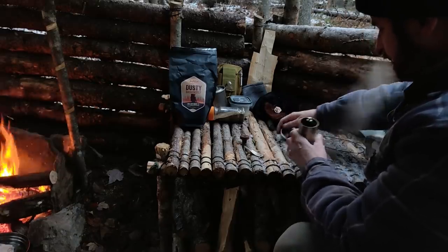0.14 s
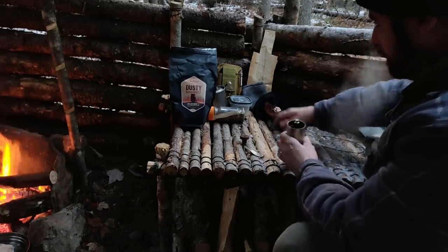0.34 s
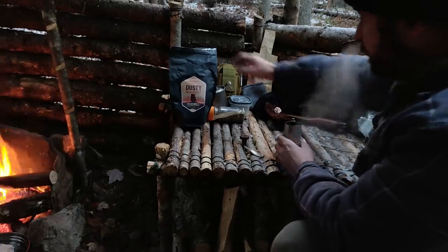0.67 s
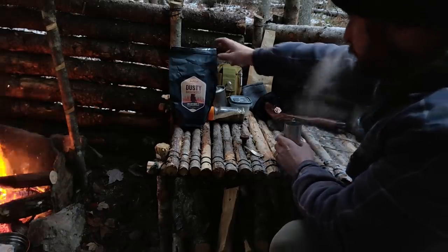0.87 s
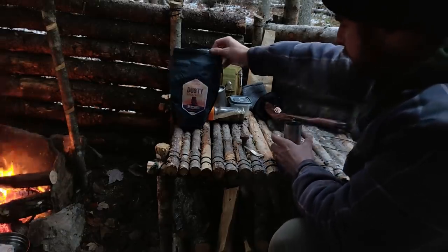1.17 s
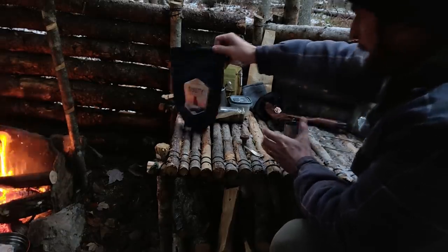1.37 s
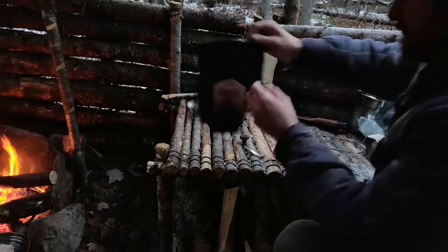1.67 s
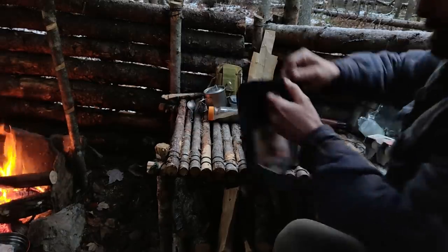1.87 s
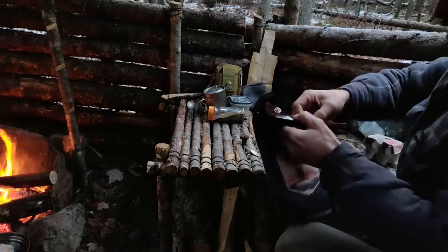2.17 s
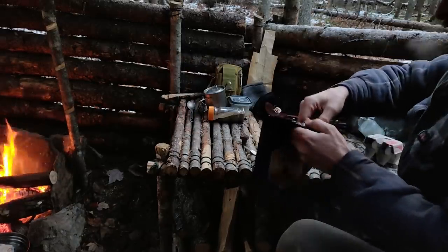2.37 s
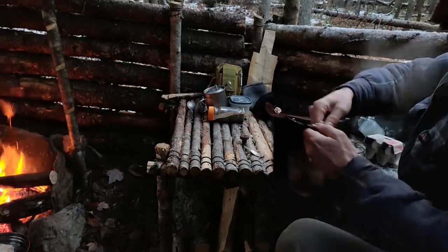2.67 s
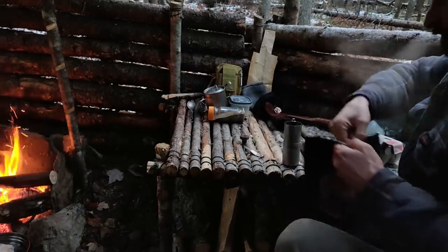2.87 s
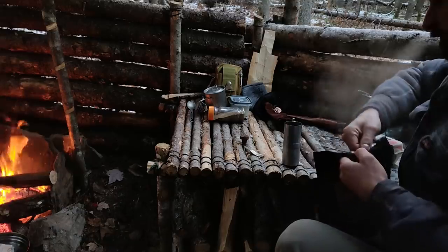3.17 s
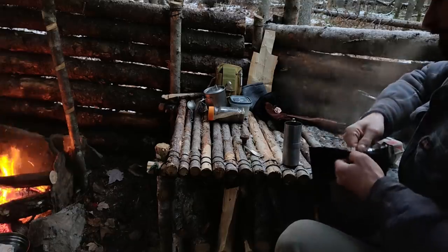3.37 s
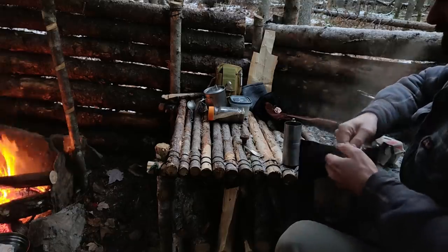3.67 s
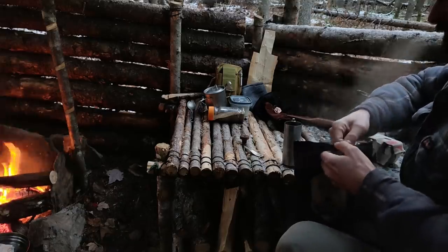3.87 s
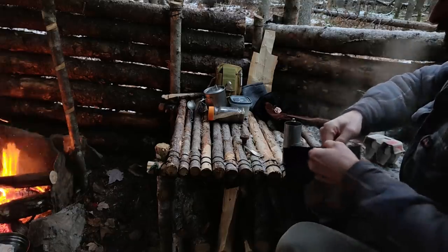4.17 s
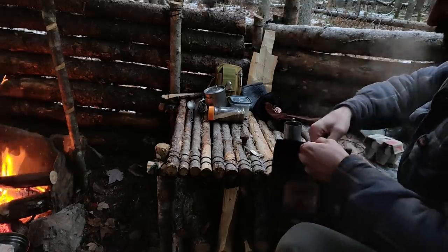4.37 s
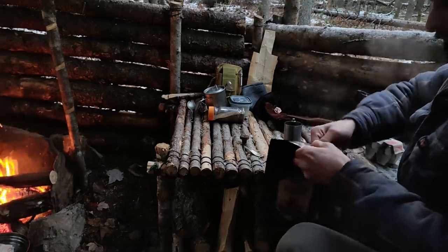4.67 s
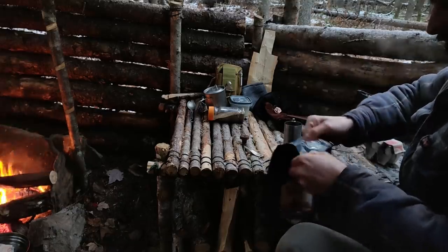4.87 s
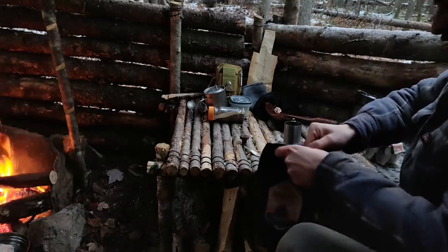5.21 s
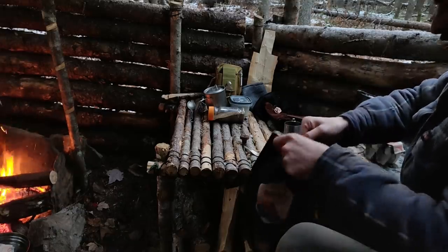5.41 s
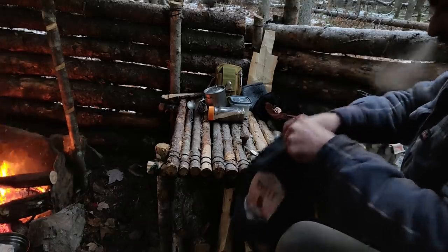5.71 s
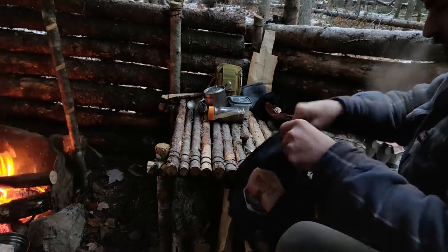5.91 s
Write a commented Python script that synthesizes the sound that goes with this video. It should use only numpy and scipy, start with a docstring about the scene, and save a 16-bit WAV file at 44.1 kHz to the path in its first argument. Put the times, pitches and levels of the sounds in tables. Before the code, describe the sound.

A faint, steady hiss and low fire flutter run throughout, with a few tiny ember ticks in the first second. From about 0.3 to 0.7 seconds a small steel crank bounces on a stick table: quick wooden knocks with a light metallic ring, stopped by a firmer knock. At 1.1 seconds hands lift a stiff foil bag with soft crinkles. Sharper, louder crackling follows from 1.9 to 2.7 seconds. The handling then thins to quiet rustle and isolated snaps, with a crisp one near 3.4 and a loud hollow pop at 3.7. From 4.5 seconds the creases snap more densely as the bag is worked open. The loudest, fullest crumpling comes between 5.3 and 6 seconds, with small air pops and a slightly hollow resonance from the opening bag. Everything sounds close and fairly dry.

```python
"""In a log shelter, at a stick table, the steel crank of a coffee grinder is laid down: each bounce
excites the damped modes of wood and steel. Hands then lift a stiff foil bag of beans and work it open.
Creases buckle and snap over a rustle, air pockets pop, and the bag's cavity resonates more as it opens.
Close by a fire flutters and its embers tick, over the hiss of the camp."""
import sys
import numpy as np
from scipy import signal
from scipy.fft import rfft, irfft
from scipy.io import wavfile
from scipy.ndimage import uniform_filter1d

SR = 44100
rng = np.random.default_rng(int(sys.argv[2]) if len(sys.argv) > 2 else 0)


def store_wav(level_fs):
    """Save 16-bit WAV to argv[1]."""
    pcm = np.round(np.clip(np.atleast_2d(level_fs), -1, 1) * 32767)
    wavfile.write(sys.argv[1], SR, pcm.T.astype(np.int16))


N = 266805
TIME = np.arange(N) / SR


def amp(db):
    """Amplitude ratio of a level in decibels."""
    return 10 ** (np.asarray(db) / 20)

def unit_rms(x):
    """Normalisation to unit mean power."""
    return x / np.sqrt(np.mean(x ** 2) + 1e-20)

def spectrum_db(points, hz):
    """Interpolation of levels on a logarithmic frequency axis."""
    point_hz, db = np.transpose(points)
    return np.interp(np.log(hz + 1), np.log(point_hz + 1), db)

def add(mix, start_s, sound):
    """Superposition: a sound sums into the mix from its start time."""
    part = mix[round(start_s * SR):][:len(sound)]
    part += sound[:len(part)]

def filtered(x, order, hz, kind):
    """Butterworth filtering, flat in the passband."""
    return signal.sosfilt(signal.butter(order, hz, kind, fs=SR, output="sos"), x)

def shaped(x, gain_db):
    """Short-time spectral weighting by gain_db(hz, t)."""
    hz, t, spectra = signal.stft(x, SR, nperseg=256)
    return signal.istft(spectra * amp(gain_db(hz[:, None], t)), SR, nperseg=256)[1][:N]


# Each row: frequency in Hz, relative spectral density in dB.
AIR_SPECTRUM = [(20, -2.5), (130, -3), (250, -6.5), (650, -8.5), (1500, -19), (5000, -18.5), (9000, -19.5),
                (12000, -10.5), (15400, -7.5), (16100, -30)]

def flames_and_hiss(level_db=-57):
    """Coloured noise, slowly modulated: the low flutter of the flames and the hiss of the camp."""
    colour = amp(spectrum_db(AIR_SPECTRUM, np.fft.rfftfreq(N, 1 / SR)))
    noise = irfft(rfft(rng.standard_normal(N)) * colour, N)
    swell_db = unit_rms(uniform_filter1d(uniform_filter1d(rng.standard_normal(N), 6000), 6000))
    return amp(level_db + swell_db) * unit_rms(noise)


# Each row: lower and upper band edge in Hz, 60 dB decay time in seconds, level in dB.
CRACK_BANDS = [(214, 457, 0.066, -14.5), (562, 1395, 0.074, -3), (1685, 3300, 0.061, -3.5),
               (3250, 6000, 0.064, -3), (5870, 11000, 0.06, -4.5), (10860, 15800, 0.068, -1)]
# Each entry: a band's gain in dB per dB of brightness. Tight creases are thin, broad folds full.
BRIGHTNESS_SLOPES = (-0.4, -0.81, 0, 0.38, 1.24, 1.58)

def cracks(events, tick_s):
    """Impulsive excitation: a sharp tick, then an exponential noise tail off foil and logs."""
    out, t = np.zeros(N), np.arange(SR // 10) / SR
    tail_db = np.array(events)[:, 3:]
    noise = rng.standard_normal((len(events), len(t)))
    noise[:, 0] = -4.5  # the onset is one spike
    for (lo_hz, hi_hz, t60, band_db), slope in zip(CRACK_BANDS, BRIGHTNESS_SLOPES):
        envelope = np.exp(-t / tick_s) + amp(tail_db - 60 * t / t60)
        bursts = filtered(noise * envelope, 3, [lo_hz, hi_hz], "band")
        peak_power = uniform_filter1d(bursts ** 2, 130, mode="constant").max(1)
        bursts /= np.sqrt(peak_power)[:, None]
        low_cut_db = -7 if slope < 0 else 0
        for (start_s, level_db, bright_db, _), burst in zip(events, bursts):
            add(out, start_s, amp(level_db + band_db + slope * bright_db + low_cut_db) * burst)
    return out


# Each row: start in seconds, level in dB, brightness in dB, tail in dB relative to the tick.
EMBER_POPS = [(0.2144, -47.5, 4.5, -7.5), (0.5854, -36.5, 4.5, -13), (0.676, -63, 15.5, -8),
              (0.8312, -42, 7.5, -5)]

def embers():
    """Each popping ember radiates a brief broadband transient."""
    return cracks(EMBER_POPS, tick_s=0.00077)


def free_vibration(modes, weight_db, t):
    """Modal superposition: damped sines set off together, each with its own weight."""
    hz, db, t60 = np.transpose(modes)[:, :, None]
    return (amp(db + weight_db[:, None] - 60 * t / t60) * np.sin(2 * np.pi * hz * t)).sum(0)


# Each row: mode frequency in Hz, relative level in dB, 60 dB decay time in seconds.
STICK_MODES = [(428, 0.5, 0.09), (666, 1.5, 0.077), (740, -5, 0.067), (853, 4.5, 0.04), (1034, 4, 0.043),
               (1080, 0.5, 0.059), (1186, 3.5, 0.047), (1370, -6, 0.057), (1600, 13, 0.016)]

def stick_knock(spot_hz, scrape_s):
    """Forced vibration: an uneven push on rough bark drives the modes near the struck spot's pitch."""
    t = np.arange(8000) / SR
    force = np.exp(-t / scrape_s) * rng.standard_normal(len(t))
    force[0] = 7  # the first touch
    weight_db = -26 * np.log2(np.array(STICK_MODES)[:, 0] / spot_hz) ** 2
    knock = signal.oaconvolve(force, free_vibration(STICK_MODES, weight_db, t))
    knock = filtered(knock, 2, 330, "high")  # the knocks carry no bass
    knock /= abs(knock).max()
    tail = np.exp(-t / (scrape_s + 0.012)) * rng.standard_normal(len(t))
    thud, clatter, grit = (250, 610, -29.5), (504, 1670, -19.5), (2370, 5700, -39)
    for lo_hz, hi_hz, db in thud, clatter, grit:
        band = filtered(tail, 2, [lo_hz, hi_hz], "band")
        onset_rms = np.sqrt(np.mean(band[:900] ** 2))
        add(knock, 0, amp(db) * band / onset_rms)
    return knock


# Each row: mode frequency in Hz, level in dB, 60 dB decay time in seconds.
STEEL_MODES = [(1750, -12, 1.2), (1796, -4, 1.5), (2560, 4, .05), (4027, -25, .4), (4613, 1, .2),
               (4660, -7, .14), (6853, -19, .08), (6910, -21, .08), (10190, -15, .04), (14700, -17, .06)]

def steel_ring(hardness):
    """Impact excitation: hard contacts favour high modes; slow bending modes need a long, soft push."""
    t = np.arange(SR // 2) / SR
    octaves = np.log2(np.array(STEEL_MODES)[:, 0] / 4600)
    tilt_db = hardness * octaves * np.where(octaves < 0, 3, 0.4)
    attack = 1 - np.exp(-t / 0.00035)
    roughness = unit_rms(uniform_filter1d(rng.standard_normal(len(t)), 40))
    chatter = 1 + 0.37 * np.exp(-t / 0.017) * roughness  # it rattles on the bark at first
    return free_vibration(STEEL_MODES, tilt_db, t) * attack * chatter


# Each row: start in seconds, knock level in dB, pitch of the struck spot in Hz,
# scrape time constant in seconds, ring level in dB, hardness as a spectral tilt factor.
BOUNCES = [(0.261, -30, 870, 0.0099, -48, 1.5), (0.305, -18.5, 1080, 0.0079, -24, 2.5),
           (0.33, -39.5, 810, 0.037, -65, -6), (0.408, -29.5, 1040, 0.023, -28, 33),
           (0.465, -35, 730, 0.049, -31.5, 36), (0.489, -35, 1030, 0.0093, -70, 10),
           (0.5245, -13.5, 546, 0.0026, -65, 4), (0.698, -40, 666, 0.027, -54, -2)]
# Each row: time in seconds, gain of the crank's low modes in dB.
LOW_MODE_DAMPING = [(.522, -5), (.535, -3), (.66, -20), (.70, -32)]

def bouncing_crank(split_hz=2200):
    """Each collision excites wood and steel; contact damping stills the crank once it lies flat."""
    wood, steel = np.zeros(N), np.zeros(N)
    for start_s, knock_db, spot_hz, scrape_s, ring_db, hardness in BOUNCES:
        add(wood, start_s, amp(knock_db) * stick_knock(spot_hz, scrape_s))
        add(steel, start_s, amp(ring_db) * steel_ring(hardness))
    low = filtered(steel, 4, split_hz, "low") * amp(np.interp(TIME, *np.transpose(LOW_MODE_DAMPING)))
    high = filtered(steel, 4, split_hz, "high") * amp(np.interp(TIME, [0.522, 0.535], [-5, -24.5]))
    return wood + low + high


def random_impulses(per_s, spread_db):
    """A Poisson process of many small impulses and a few larger ones."""
    sizes = amp(spread_db * np.minimum(rng.exponential(1, N), 4))
    return sizes * (rng.random(N) < per_s / SR)

def crease_power(per_s, spread_db, t60=0.036):
    """Incoherent summation: the decaying powers of tiny creases add."""
    decay = amp(-120 / (t60 * SR))
    power = signal.lfilter([1], [1, -decay], random_impulses(per_s, spread_db) ** 2)
    return power / power.mean()

def dimples():
    """Snap-through: small dents in the foil flip at random, each ringing a few cycles at its pitch."""
    out, t = np.zeros(N), np.arange(900) / SR
    flips = random_impulses(per_s=350, spread_db=3.4)
    pitch_index = rng.integers(0, 14, N)
    for k, hz in enumerate(np.geomspace(560, 3600, num=14)):
        ring = np.sqrt(hz) * np.exp(-t * hz / 1.8) * np.sin(2 * np.pi * hz * t)
        out += signal.oaconvolve(flips * (pitch_index == k), ring)[:N]
    return unit_rms(out)


# Each row: time in seconds, rustle level in dB, brightness in dB.
HANDLING = [(1.08, -86, 2), (1.24, -57, 1), (1.55, -55.5, -13), (1.7, -61, -4), (1.87, -71, 10),
            (1.91, -41.5, -9), (2.08, -47.5, -2), (2.25, -41, -1.5), (2.4, -52.5, 6.5), (2.56, -40, -4.5),
            (2.76, -54.5, -0.5), (3.1, -60.5, -2.5), (3.36, -65, 3), (3.6, -59, 1.5), (4.0, -62, 2),
            (4.42, -61, 4), (4.78, -52, -7), (4.95, -39, -7), (5.3, -42.5, -16.5), (5.44, -29.5, -12),
            (5.485, -34.5, -10), (5.6, -33, -3.5), (6.05, -34, -4)]
# Each row: centre and duration in seconds, added level in dB, added brightness in dB.
CRUSHES = [(1.307, 0.061, 6.5, 4), (1.586, 0.047, 8, 3), (1.874, 0.011, 5, 13), (2.143, 0.036, 12, -2),
           (2.203, 0.076, 6, 5), (2.256, 0.025, 7, 4), (2.34, 0.029, 11, 6), (3.426, 0.04, 18, -3),
           (3.487, 0.051, 10.5, -3), (3.582, 0.028, 10.5, 9), (3.686, 0.033, 11, -29),
           (3.857, 0.064, 9, 5.5), (4.466, 0.03, 18, -10), (4.894, 0.036, 13, 14), (5.026, 0.12, 2.5, -6),
           (5.401, 0.096, 7, 12), (5.55, 0.061, 9, 5.5), (5.707, 0.033, 6.5, 0.5), (5.775, 0.11, 5.5, 0.5),
           (5.969, 0.059, 10.5, 2.5)]

def grip_db(t, column):
    """Envelope of the handling: a slow curve, plus a bump wherever a grip crushes many creases."""
    curve = np.transpose(HANDLING)
    bumps = sum(row[column + 1] * np.exp(-((t - row[0]) / (row[1] / 2)) ** 4) for row in CRUSHES)
    return np.interp(t, curve[0], curve[column], left=-99) + bumps


# Each row: frequency in Hz, relative spectral density in dB.
FOIL_SPECTRUM = [(35, -59), (213, -12), (412, 0.5), (486, -7.5), (644, 0.5), (1160, -2), (1690, -1.5),
                 (7960, -14), (14700, -7.5), (16500, -36)]

def rustle():
    """Modulated noise: each size of fold crackles in its own band, some creases in all, over a bed."""
    shared = crease_power(per_s=600, spread_db=3.9)
    edges_hz, folds = np.geomspace(130, 17000, num=9), np.zeros(N)
    for band_hz in zip(edges_hz, edges_hz[1:]):
        power = crease_power(per_s=130, spread_db=4) + 0.6 * shared + 0.2
        folds += filtered(np.sqrt(power) * rng.standard_normal(N), 2, band_hz, "band")
    foil = unit_rms(shaped(folds, lambda hz, t: spectrum_db(FOIL_SPECTRUM, hz))) + amp(-7) * dimples()
    # brightness tilts the treble above 2 kHz, levelling off at 11 kHz
    foil = shaped(foil, lambda hz, t: grip_db(t, 2) * np.log2(1 + (hz.clip(max=11000) / 2000) ** 2) / 4)
    foil *= amp(grip_db(TIME, 1))
    return filtered(foil, 2, 110, "high")  # the rustle carries no deep bass


# Each row: centre frequency in Hz, bandwidth in Hz, relative gain in dB.
CAVITY_MODES = [(420, 53, 0), (656, 71, -1), (900, 215, -6), (1110, 190, -9.5)]
# Each row: time in seconds, gain of the resonance in dB as the bag opens.
OPENING = [(5.3, -11), (5.9, 1.5)]

def bag_cavity(x):
    """Cavity resonance: the bag's sounds ring on in its air space."""
    resonance = sum(amp(db) * signal.lfilter(*signal.iirpeak(hz, hz / width, SR), x)
                    for hz, width, db in CAVITY_MODES)
    return x + resonance * amp(np.interp(TIME, *np.transpose(OPENING)))


# Each row: start in seconds, level in dB, brightness in dB, tail in dB relative to the tick.
CREASE_SNAPS = [(1.1264, -51.5, -10, 4), (1.1599, -42, -1.5, -4), (1.1842, -41.5, -2, 1),
                (1.2288, -40.5, 1, -20), (1.2529, -38.5, 1, -8), (1.2669, -40, -5, 15),
                (1.3648, -33, -7, 0), (1.4068, -41.5, -2, -6), (1.4435, -49, -11, 0), (1.4646, -36, -4, -8),
                (1.5305, -26, 0.5, -6), (1.5505, -46, -11, -10), (1.5674, -38.5, -4.5, 3),
                (1.6598, -30.5, -1.5, -7), (1.688, -50, -16, -2), (1.7432, -49.5, 2.5, -3),
                (1.9039, -21.5, -3.5, 2), (1.9222, -18.5, -0.5, -8), (1.9461, -29.5, -4, -19),
                (1.9552, -21, 0, -12), (1.965, -29.5, -4, -20), (1.9987, -36, -7, -7),
                (2.0117, -29.5, -2, -5), (2.0278, -25.5, -4, 22), (2.0424, -22, -3.5, -2),
                (2.0977, -36, -4, -12), (2.1729, -38, -9, 3), (2.1841, -30.5, -6, -9),
                (2.2248, -35, 9.5, 15), (2.2317, -31.5, -4.5, -7), (2.348, -32, -7, -5),
                (2.4283, -38, -5, 5), (2.4398, -36.5, 2, 3), (2.452, -34, -8, 15), (2.47, -18.5, 3.5, -2),
                (2.5226, -32.5, -15, 10), (2.5334, -25, -4.5, 15), (2.683, -22.5, 2, -4.5),
                (2.72, -40, -2, 2), (2.778, -45.5, -4, 7), (2.8606, -44, -3, -19), (3.0194, -44, 0, 3),
                (3.035, -49, -4, 7), (3.0475, -29, -5, -12.5), (3.216, -47, -7.5, -5),
                (3.2879, -50.5, -1, 4), (3.3697, -19.5, 3.5, -7), (3.413, -46.5, -8, 0),
                (3.4337, -45, 10, 16), (3.4463, -25, 4.5, -1.5), (3.5289, -48, -13, 2),
                (3.6441, -47, -1, 1), (3.671, -53, -13, -8), (3.7092, -47, -14, -6), (3.7197, -16, -1, -7),
                (3.8688, -26, 3.5, -9.5), (3.9843, -39, 2.5, -13), (4.0643, -44.5, 8, -8),
                (4.4532, -47, -10, -10), (4.5122, -35, -9, 15), (4.529, -29, -2.5, -7),
                (4.5808, -41, -9, 1), (4.6198, -40.5, -4, -4), (4.6962, -27.5, -3, 4),
                (4.7155, -25.5, 4.5, -10), (4.7357, -29, 0, -1), (4.8238, -28.5, 0, 17),
                (4.8388, -20, 2, -1), (4.8642, -30, 1, -6), (4.8781, -21.5, -2.5, 5),
                (4.8992, -16.5, 0, -2), (4.9381, -30, -5, -4), (4.9506, -28.5, -4, 2), (4.9818, -30, -8, 2),
                (5.0045, -28, -12, -4), (5.0134, -19, -8, -3), (5.0324, -24, -3.5, 9),
                (5.0717, -31, -10, -21), (5.092, -36, -4, -2), (5.112, -45, -5, -5), (5.1325, -47, 2, -11),
                (5.1637, -32, -4.5, -4), (5.204, -30, 0, -2), (5.2168, -26, -8, 7), (5.2227, -24, 2.5, 11),
                (5.2429, -18.5, 5, 2), (5.2746, -42, -8, 5), (5.288, -34, -9.5, 3), (5.3121, -38, -7, 1),
                (5.3426, -26, -7.5, 17), (5.3466, -17.5, -2.5, -6), (5.3664, -17, -4.5, 4),
                (5.3801, -27, 5, -2), (5.402, -24.5, 1, 1), (5.4047, -19, 5, -7), (5.410, -17, -6, -13),
                (5.4132, -18, 5, -10), (5.493, -31, -9, 5), (5.5101, -20.5, -1, -4), (5.516, -23, -8, -3),
                (5.5835, -21, -2, -6), (5.588, -17, -1.5, -5), (5.6326, -25, -0.5, -29),
                (5.6639, -17.5, -2.5, -5), (5.6735, -26, -3, -2), (5.7711, -24.5, -8, 15),
                (5.801, -25, -4.5, -13), (5.821, -36, -2, -1), (5.8565, -21.5, -10, 3),
                (5.8659, -21.5, -4.5, 8), (5.942, -25.5, -9, 15), (6.0388, -45, -15, -18)]

def snapping_creases():
    """Buckling: a crease gives way with a tick, or crumples when its tail is above 0 dB."""
    return cracks(CREASE_SNAPS, tick_s=0.001)


# Each row: start in seconds, level in dB, pitch in Hz.
POCKET_POPS = [(1.253, -28, 3600), (1.267, -32, 3840), (1.364, -21, 660), (2.14, -28, 700),
               (2.349, -28, 696), (3.413, -37, 700), (3.418, -36, 3100), (3.447, -23, 4780),
               (3.529, -37, 665), (3.671, -37.5, 665), (3.686, -40, 800), (3.721, -10, 800),
               (3.73, -16, 900), (4.951, -28, 2900), (5.004, -17, 2520), (5.014, -14.5, 2500),
               (5.591, -13.5, 1170), (5.632, -18, 3100), (5.856, -16, 866), (5.961, -13, 1210)]

def pockets():
    """Damped oscillation: an air pocket or taut panel pops and rings, more briefly when higher."""
    out, t = np.zeros(N), np.arange(4000) / SR
    for start_s, level_db, hz in POCKET_POPS:
        time_scale = (700 / hz) ** 0.7
        rise_s, t60 = 0.0017 * time_scale, 0.036 * time_scale
        envelope = amp(level_db - 60 * t / t60) * (1 - np.exp(-t / rise_s))
        add(out, start_s, envelope * np.sin(2 * np.pi * hz * t))
    return out


def scene():
    """Linear superposition of all sources in one channel."""
    mix = bouncing_crank() + embers() + bag_cavity(snapping_creases() + rustle()) + pockets()
    return (mix + flames_and_hiss())[None]


# Each row: frequency in Hz, gain in dB.
MIC_RESPONSE = [(4000, 4), (6000, 2.5), (8000, 7.5), (10500, -4), (16000, -12.5)]

def record(dry, ceiling=0.92, cutoff_hz=16700):
    """Transduction: microphone colour, soft saturation of the loudest snaps, then a band limit."""
    coloured = shaped(dry[0], lambda hz, t: spectrum_db(MIC_RESPONSE, hz))
    saturated = ceiling * np.tanh(coloured / ceiling)
    lowpass = signal.firwin(255, cutoff_hz, window=("kaiser", 9), fs=SR)
    return signal.oaconvolve(saturated, lowpass, "same")[None]


dry = scene()
out = record(dry)
store_wav(out)
```